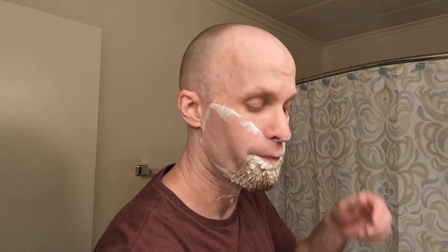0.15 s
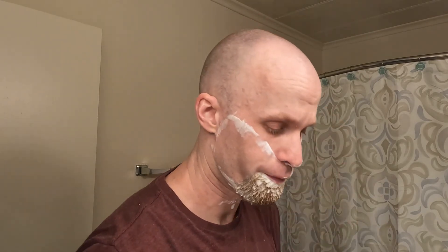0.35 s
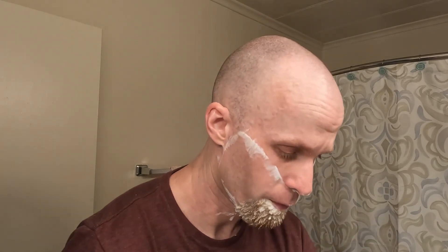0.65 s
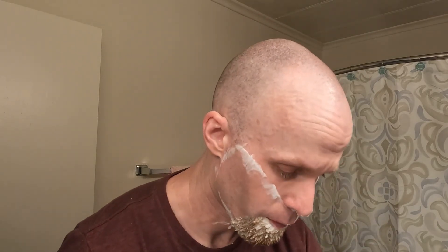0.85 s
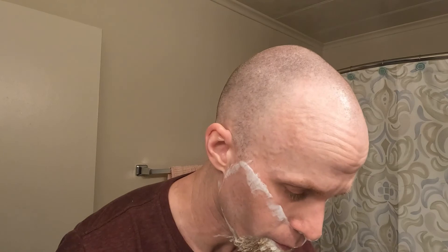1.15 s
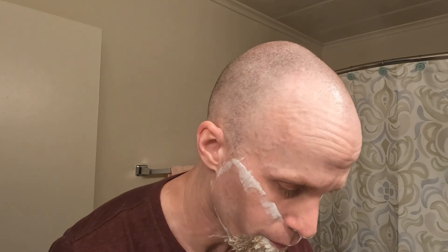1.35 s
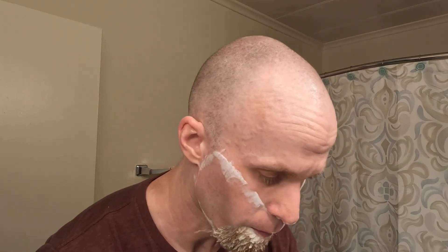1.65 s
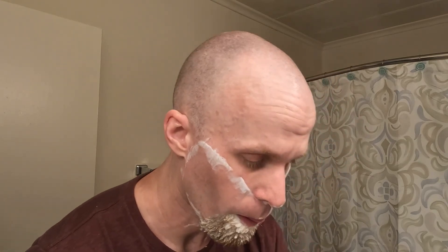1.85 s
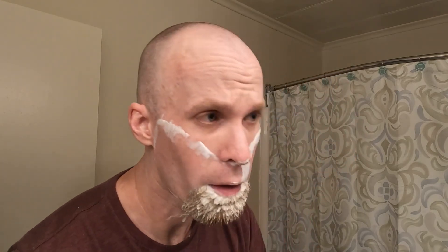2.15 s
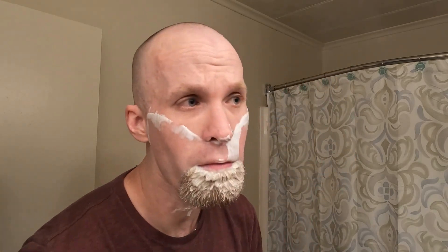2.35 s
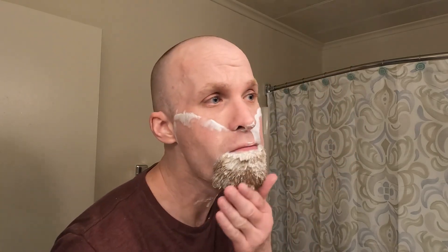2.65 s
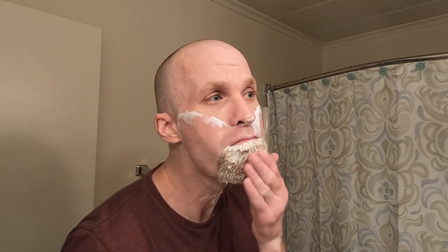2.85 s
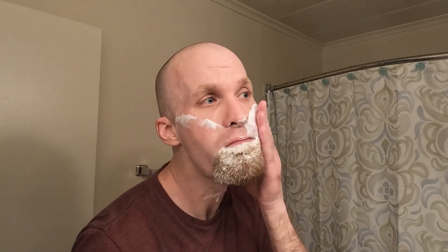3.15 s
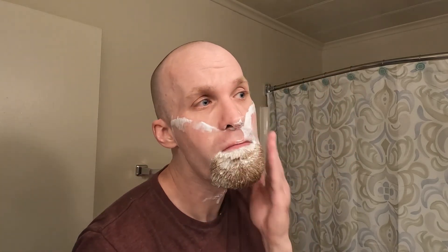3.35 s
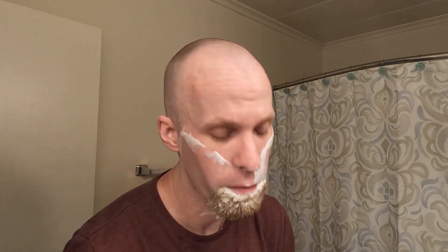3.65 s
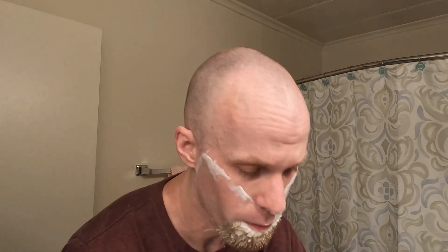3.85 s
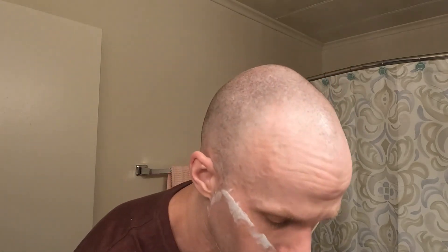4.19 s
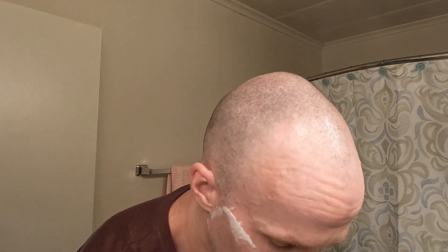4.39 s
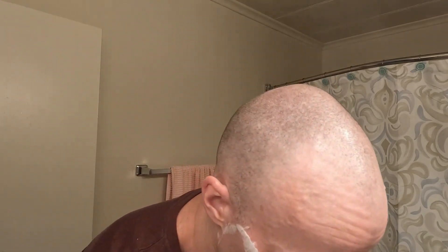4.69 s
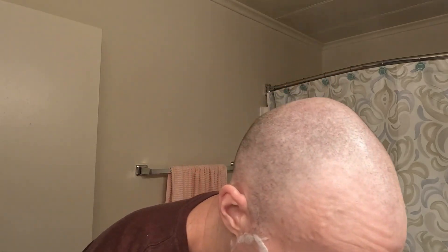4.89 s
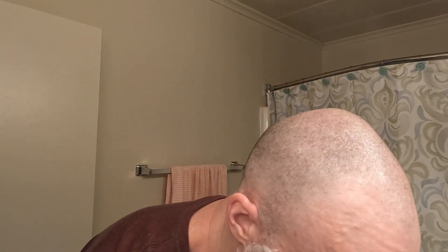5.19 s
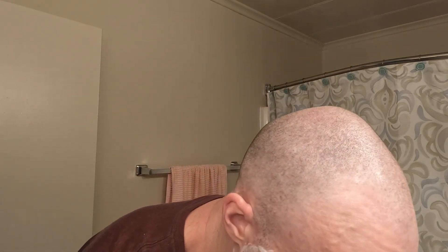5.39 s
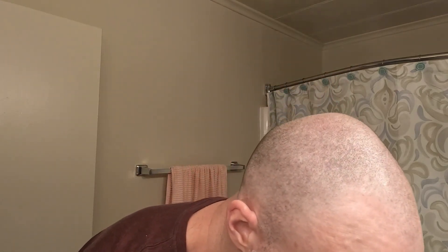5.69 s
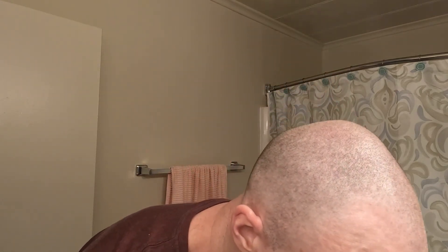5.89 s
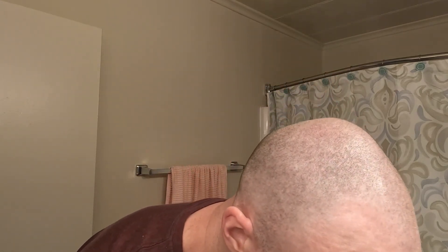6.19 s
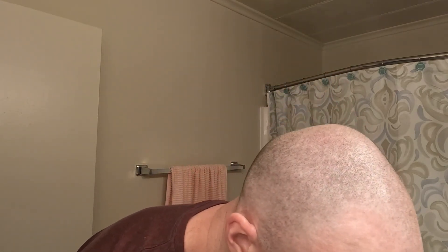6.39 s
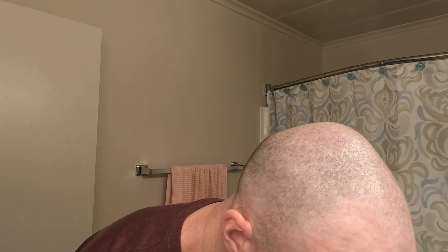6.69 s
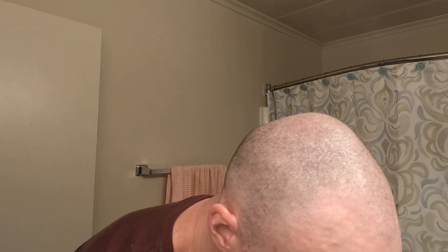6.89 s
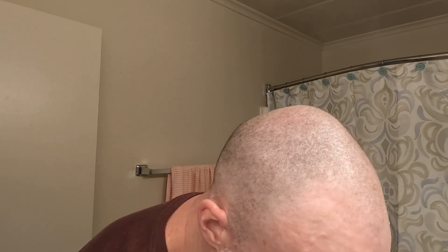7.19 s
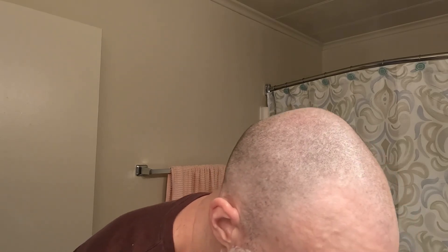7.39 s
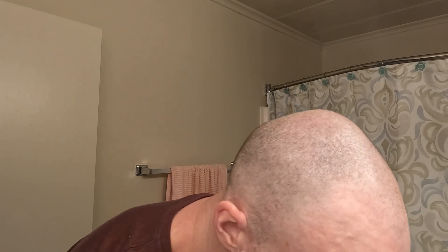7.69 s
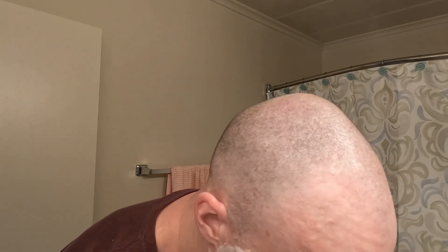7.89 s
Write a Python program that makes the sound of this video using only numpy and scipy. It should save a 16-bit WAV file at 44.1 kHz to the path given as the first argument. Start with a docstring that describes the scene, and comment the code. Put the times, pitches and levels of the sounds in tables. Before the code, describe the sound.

In a small hard-walled bathroom, close to the sink, a drain gurgles faintly, then a pipe thuds and a tap gushes for about a second, hands splashing. It shuts with a loud, ringing knock. A few drops tick, a palm rasps softly over stubble, then the tap runs again for four seconds with splashes and ends on another knock.

```python
"""A drain gurgles softly, then a pipe knocks and a tap runs into a basin in a small bathroom, twice.
The knocks are short thuds with a booming, ringing basin; the pipe knocks as the valve opens or shuts.
The jet is thousands of tiny bubbles mixed with hiss, over a low drumming of filtered noise.
Hands rinsing under it throw splashes, made of clusters of bubbles, and the last drops are smaller clusters.
Between the bursts a palm rubs over stubble: rasping bubbles and hiss, with soft bumps of narrow noise."""
import sys
import numpy as np
from scipy import signal
from scipy.fft import rfft, irfft, next_fast_len
from scipy.io import wavfile
from scipy.ndimage import uniform_filter1d, map_coordinates

SR = 44100
rng = np.random.default_rng(int(sys.argv[2]) if len(sys.argv) > 2 else 0)


def to_wav(sig):
    """Store sig (one row per channel, or 1-D mono) as 16-bit WAV at the path in sys.argv[1].

    Samples outside -1..1 are clipped; the rate is SR.
    """
    pcm = np.clip(np.atleast_2d(sig), -1, 1) * 32767
    pcm = np.round(pcm).astype(np.int16)
    wavfile.write(sys.argv[1], SR, pcm.T)  # frames by channels


N = 354563
TOP_HZ = 15740  # no sound passes above this pitch


def amp(db):
    """Turn decibels into gain."""
    return 10 ** (np.asarray(db) / 20)


def unit(x):
    """Scale a sound to an rms of 1."""
    return x / np.sqrt(np.mean(x ** 2) + 1e-20)


def along(points, hz):
    """Read values between (Hz, value) points, with pitch on a log axis."""
    f, v = np.transpose(points)
    return np.interp(np.log(hz + 1), np.log(f + 1), v)


def wobble(rate):
    """A smooth random curve through a given number of random points per second."""
    knots = rng.standard_normal(int(N * rate / SR) + 4)
    return map_coordinates(knots, [np.arange(N) * rate / SR])


def filtered(x, response):
    """Multiply the spectrum of a sound by a response, given as a function of frequency."""
    size = next_fast_len(N + SR // 2)
    hz = np.fft.rfftfreq(size, 1 / SR)
    return irfft(rfft(x, size) * response(hz), size)[:N]


def coloured(x, spectrum):
    """Shape a sound by (Hz, dB) points and scale it to an rms of 1."""
    return unit(filtered(x, lambda hz: amp(along(spectrum, hz))))


def add(track, s, sound):
    """Mix a sound into the track, starting s seconds in."""
    part = track[max(round(s * SR), 0):][:len(sound)]
    part += sound[:len(part)]


def jet():
    """The aerated jet bursts into bubbles and spray, and drums on the basin."""
    # Three spectra. Each row: frequency in Hz, level in dB per Hz.
    splatter_colour = [(300, -58), (800, -33), (1200, -6), (2000, -0.5), (3000, 2.5), (3900, 0.5),
                       (5500, -7), (8000, -19.5), (15000, -31)]
    spray_colour = [(1500, -28.5), (4000, 7.5), (5800, 7), (7200, 4), (8600, -5), (11000, -8),
                    (15500, -19.5)]
    drum_colour = [(30, -50.5), (70, -30), (110, -24), (150, -12), (300, -7), (430, 1.5), (600, -8.5),
                   (800, -15), (1500, -27), (4000, -53)]
    splatter_gain, spray_gain, drum_gain = jet_gains()
    splatter = fizz(count=16000, cycles=32.6, scatter_db=2.5, hiss_db=2.0)
    splatter = bowl(coloured(splatter, splatter_colour))
    spray = coloured(fizz(count=16000, cycles=8.6, scatter_db=0.5, hiss_db=4.0), spray_colour)
    drumming = bowl(coloured(rng.standard_normal(N), drum_colour)) * amp(1.23 * wobble(14))
    flutter = amp(0.5 * wobble(45))  # the stream breaks up unevenly
    water = flutter * (amp(-1.0) * splatter_gain * splatter + amp(2.0) * spray_gain * spray)
    return bathroom(water, wet_db=-9.5) + drum_gain * drumming


def jet_gains():
    """Gains of splatter, spray and drumming: a hand turns the jet to spray and shields the basin."""
    # Runs of the tap. Each row: valve opens in seconds, valve shuts in seconds,
    # then the base levels of splatter, fine spray and basin drumming, each in dB.
    runs = [(0.614, 1.671, -35, -43, -42), (4.041, 7.992, -35, -43, -42.5)]
    rise_s, spray_rise_s = 0.047, 0.05  # spray builds more slowly
    spray_lingers_s = 0.082  # and outlasts the jet
    splatter, spray, drum = np.zeros((3, N))
    for opens, shuts, splatter_db, spray_db, drum_db in runs:
        splatter += amp(splatter_db) * tap_flow(opens, shuts, rise_s, dies_db_per_s=190)
        spray += amp(spray_db) * tap_flow(opens, shuts + spray_lingers_s, spray_rise_s, dies_db_per_s=270)
        drum += amp(drum_db) * tap_flow(opens, shuts, rise_s, dies_db_per_s=120)
    lift_db = rinsing()
    # dB that the basin sounds lose for each dB that the spray gains
    shields_splatter, shields_drum = 0.05, 0.15
    return splatter * amp(-shields_splatter * lift_db), spray * amp(lift_db), drum * amp(-shields_drum * lift_db)


def tap_flow(opens, shuts, rise_s, dies_db_per_s):
    """Gain of one run: the water arrives, builds up, holds, and dies away after the shutting time."""
    fall_s = 0.024  # the water takes this long to reach the basin
    t = np.arange(N) / SR
    build_up = np.clip((t - opens - fall_s) / rise_s, 0, 1)
    return build_up * amp(-dies_db_per_s * np.maximum(t - shuts, 0))


def rinsing():
    """The dB by which a hand or razor under the jet raises the spray: in fast, drifting off, then out."""
    # Times under the jet. Each row: start in seconds, length in seconds, spray lift in dB before it sags.
    rinses = [(0.769, .17, 5), (1.206, 0.18, 6.5), (1.418, 0.33, 6.5), (4.189, 0.047, 6.5),
              (4.328, .28, 2.5), (4.765, 0.29, 3.5), (5.997, 0.34, 1.5), (6.812, 0.18, 5.5),
              (7.252, 0.09, 5.5), (7.708, 0.47, 5)]
    enter_s, leave_s, sag_s = 0.018, 0.05, 0.9
    t = np.arange(N) / SR
    lift_db = np.zeros(N)
    for s, length, db in rinses:
        age = np.maximum(t - s, 0)
        held = np.clip(age / enter_s, 0, 1) * np.clip(1 - (age - length) / leave_s, 0, 1)
        drift = np.exp(-age / sag_s)  # the hand drifts off centre
        lift_db = np.maximum(lift_db, db * held * drift)
    return lift_db


def fizz(count, cycles, scatter_db, hiss_db):
    """A swarm of bubbles spread evenly over time and pitch, on a bed of hiss."""
    when, pitch, chance = rng.random((count, 3)).T
    hz = 900 + pitch * 13000
    # a few bubbles are much louder than the rest
    sizes = amp(-scatter_db * np.log(np.maximum(chance, 0.004))) * hz
    swarm = unit(bubbles(when * N / SR, hz, sizes, cycles))
    return swarm + amp(hiss_db) * rng.standard_normal(N)


def bubbles(times, hz, sizes, cycles, size=320):
    """Fading sines, down 60 dB after some cycles; pitch climbs as each bubble nears the surface."""
    t = np.arange(size) / SR
    turns = np.minimum(hz, TOP_HZ)[:, None] * t
    age = turns / cycles
    soft_start = 1 - np.exp(-2 * turns)
    climbing = np.sin(2 * np.pi * turns * (1 + 0.19 * np.minimum(age, 1)))
    rings = sizes[:, None] * soft_start * amp(-60 * age) * climbing
    at = (np.maximum(times, 0) * SR).astype(int)[:, None] + np.arange(size)
    swarm = np.bincount(at.ravel(), rings.ravel(), N)[:N]
    # bubbles this small radiate no bass
    return filtered(swarm, lambda f: (1j * f / (1j * f + 500)) ** 2)


def bowl(x):
    """The basin resonates, lifting (or dipping) narrow bands of whatever sounds inside it."""
    # Resonances of the bowl. Each row: centre in Hz, width in Hz, lift in dB.
    resonances = [(247.7, 14, 9), (404.5, 28, 5.5), (433.6, 27.5, 5), (466, 13, 2.5), (544, 63, 9.5),
                  (679.8, 27, 13.5), (880, 28, 9.5), (1085, 40, 13.5), (1405, 25, -10.5), (1433, 65, 3),
                  (1980, 110, 6.5), (2840, 58, 3), (3280, 88, -3.5), (3575, 65, 4.5)]

    def response(hz):
        return amp(sum(db / (1 + (2 * (hz - centre) / width) ** 2) for centre, width, db in resonances))

    return unit(filtered(x, response))


def knocks():
    """The valve jolts the pipe: a dull thud, a boom from the basin, and a few modes ringing on."""
    # The basin's dull boom. Each row: frequency in Hz, level in dB per Hz before the tilt.
    boom_colour = [(25, -47), (58, -18), (95, -15.5), (125, -3.5), (180, -6.5), (205, -6), (245, 4),
                   (300, -8.5), (400, -3), (510, -7), (680, -11.5), (770, -21.5), (1000, -18.5),
                   (1300, -22), (2000, -30.5), (5000, -50)]
    # Long-ringing modes of basin and cabinet.
    # Each row: pitch in Hz, level in dB before the tilt, time to fall 60 dB in seconds.
    modes = [(78.6, -15.5, 0.9), (126.7, -10, .35), (152, -8, 1.0), (179.6, -24, 0.61), (246, -16, 0.45),
             (288, -16.5, 1.2), (314, -17, 2.1), (394, -14, 0.5), (412, -5, .35), (479, -3.5, 0.66),
             (681, -6.5, 0.55), (894, -14, 0.34)]
    out, t = np.zeros(N), np.arange(SR) / SR
    grid = np.fft.rfftfreq(SR, 1 / SR)
    for s, db, thud_hz, boom_db, tilt_db, ring_db in contacts():
        # a soft contact: a few cycles under a smooth hump
        swell = t / 0.004
        thud = swell ** 2 * np.exp(1 - swell ** 2) * np.sin(2 * np.pi * thud_hz * t)
        colour = amp(along(boom_colour, grid) + tilt_db * np.log2((grid + 20) / 400))
        boom = unit(irfft(colour * np.exp(2j * np.pi * rng.random(len(grid))), SR))
        # a quick fade, then a quieter, slower one
        boom *= amp(-60 * t / 0.21) + amp(-9.5 - 60 * t / 0.93)
        ring = np.zeros(SR)
        for hz, level, t60 in modes:
            fade = amp(level + tilt_db * np.log2(hz / 400) - 60 * t / t60)
            ring += fade * np.sin(2 * np.pi * (hz * t + rng.random()))
        basin = amp(boom_db) * (boom + amp(ring_db) * ring) * (1 - np.exp(-t / 0.0032))
        add(out, s, amp(db) * thud + basin)
    return out


def contacts():
    """Every knock is a first touch of the pipe on its bracket, a blow and a rebound."""
    # Knocks as the valve moves and as the water surges through. Each row: blow in seconds,
    # thud level in dB, thud pitch in Hz, boom level in dB, boom tilt in dB per octave,
    # first touch in dB relative to the blow, ring level in dB relative to the boom.
    blows = [(.623, -22, 320, -34, -.5, 2, -10), (.685, -30, 280, -44, -10, -9, -15),
             (1.683, -12.5, 450, -22, -.5, -7.5, -9.5), (4.039, -36.5, 227, -48, 0.5, 4, -16),
             (4.085, -37, 220, -51.5, -9, -6, -15), (7.999, -16.5, 415, -24.5, -1, -9.5, -9)]
    for s, db, hz, boom_db, tilt_db, touch_db, ring_db in blows:
        # delay in seconds, level step in dB, pitch ratio: touch, blow, rebound
        for delay, step_db, ratio in [(-0.008, touch_db, 1.5), (0, 0, 1), (0.01, -6, 0.765)]:
            yield s + delay, db + step_db, hz * ratio, boom_db + step_db, tilt_db, ring_db


def splashes(count=70):
    """Water spilling off the hands traps a cluster of like-sized bubbles."""
    # Splashes off the hands. Each row: start in seconds, level in dB before a small trim,
    # bubble pitch in Hz, pitch spread in octaves, length scale in seconds.
    spills = [(0.785, -30.5, 5000, 0.46, .023), (1.102, -29, 2150, 0.67, .013),
              (1.214, -29, 3450, 0.49, 0.041), (1.318, -31, 3050, 0.28, 0.027),
              (1.445, -38, 3850, 0.13, 0.017), (1.502, -29.5, 5000, 0.27, .011),
              (4.23, -31.5, 3980, .52, .03), (4.707, -20.5, 3660, .07, .003),
              (4.716, -28.5, 3300, .062, .0043), (4.773, -38, 7000, .16, .0089),
              (4.894, -29.5, 3950, 0.21, .027), (5.026, -35, 2280, 0.11, .055),
              (5.099, -38.5, 3520, .14, .13), (6.25, -32, 2100, 0.26, 0.023),
              (6.304, -34.5, 1590, 0.24, .03), (6.829, -26.5, 2800, 0.29, .02),
              (7.352, -32, 2370, 0.21, 0.02), (7.437, -45, 2850, .15, .011), (7.818, -36, 1127, 0.05, .01)]
    when, pitch, loud = rng.standard_normal((len(spills), count, 3)).T
    s, db, hz, spread, length = np.transpose(spills)
    pitches = hz * 2 ** (spread * pitch)
    # the bubbles of a splash share its energy; small ones die sooner
    shares = amp(6.0 * loud)
    shares = shares / np.linalg.norm(shares, axis=0)
    sizes = amp(db - 0.5) * shares * np.sqrt(length * pitches)
    times = s + 0.8 * length * np.abs(when)
    cluster = bubbles(times.ravel(), pitches.ravel(), sizes.ravel(), cycles=37, size=1400)
    return bathroom(cluster, wet_db=-4)


def drops(count=12):
    """Each late drop lands with a tick and shatters into weaker ones."""
    # Last drops on the basin. Each row: landing in seconds, level in dB before a small trim,
    # middle pitch in Hz.
    landings = [(1.816, -28.5, 7050), (1.885, -33.5, 4300), (1.925, -46, 4200), (2.008, -44.5, 7500),
                (2.035, -39, 8500), (2.044, -46, 3400), (2.18, -61, 10000)]
    s, db, hz = np.transpose(landings)
    delay, pitch = rng.standard_normal((len(landings), count, 2)).T
    delay = np.abs(delay) - np.abs(delay).min(0)  # the first tick comes on time
    sizes = amp(db + 0.5 - 6.7 * delay)  # later ticks are weaker
    times = s + 0.0073 * delay
    pitches = hz * 2 ** (0.28 * pitch)
    ticks = bubbles(times.ravel(), pitches.ravel(), sizes.ravel(), cycles=9.6)
    return bathroom(ticks, wet_db=-5)


def stubble():
    """Short hairs flick back under the sliding palm; the hand bumps and scuffs as it moves."""
    # Colour of the rasp. Each row: frequency in Hz, level in dB per Hz.
    rasp_colour = [(300, -31), (1000, 2.5), (2000, 3.5), (3100, 8), (4000, 4), (5300, 3), (8000, -9.5),
                   (11000, -15), (15000, -27)]
    # Soft bumps and scuffs. Each row: start in seconds, level in dB before a small trim,
    # centre in Hz, width in Hz, length in seconds.
    scuffs = [(.495, -63, 610, 150, .07), (2.685, -60, 575, 130, .082), (3.082, -56.5, 1750, 400, 0.019),
              (3.1, -66, 1550, 400, .07), (3.541, -56.5, 425, 140, .034), (3.755, -54, 456, 100, 0.069),
              (3.76, -63.5, 900, 250, 0.046)]
    rasp = coloured(fizz(count=14000, cycles=6.3, scatter_db=2.5, hiss_db=2.5), rasp_colour)
    return bathroom(palm_strokes() * rasp + amp(0.5) * murmurs(scuffs), wet_db=-8)


def palm_strokes():
    """Gain of the rasp: in each stroke the palm speeds up and slows again."""
    # Strokes on the cheek. Each row: start in seconds, length in seconds, peak rasp gain in dB.
    strokes = [(2.473, 0.15, -58.5), (2.658, 0.17, -58), (2.784, 0.21, -53), (2.914, .25, -60.5)]
    gain = np.zeros(N)
    for s, length, db in strokes:
        add(gain, s, amp(db) * np.sin(np.linspace(0, np.pi, int(length * SR))))
    return gain


def drain():
    """Water trickles through the trap; larger air pockets hum briefly."""
    # Colour of the trickle. Each row: frequency in Hz, level in dB per Hz.
    trickle_colour = [(100, -45), (200, -14.5), (270, -1), (330, 2), (410, 0), (480, -14.5), (900, -19),
                      (3000, -81)]
    # Air pockets. Each row: start in seconds, level in dB before a trim, pitch in Hz, length in seconds.
    gulps = [(0.251, -50, 326, 0.052), (0.34, -53, 347, 0.15), (2.019, -44.5, 375, 0.089),
             (2.315, -50, 337, .028), (2.495, -56, 295, 0.12), (2.835, -57, 160, 0.061),
             (2.94, -51, 282, 0.041), (3.206, -49, 332, .019), (3.883, -47, 407, 0.14)]
    trickle = amp(-61.5 + 3.4 * wobble(22)) * coloured(rng.standard_normal(N), trickle_colour)
    width = 0.048  # bandwidth of an air pocket as a share of its pitch
    pockets = murmurs([(s, db, hz, width * hz, length) for s, db, hz, length in gulps])
    return trickle + amp(-5.0) * bathroom(pockets, wet_db=-16.5)


def murmurs(rows):
    """Short swells of noise in a narrow bell-shaped band, used for air pockets and scuffs."""
    out, hz = np.zeros(N), np.fft.rfftfreq(SR // 4, 1 / SR)
    for s, db, centre, width, length in rows:
        bell = -0.5 * ((hz - centre) / width) ** 2
        band = irfft(np.exp(bell + 2j * np.pi * rng.random(len(hz))))[:int(length * SR)]
        swell = np.sin(np.linspace(0, np.pi, len(band)))
        add(out, s, amp(db) * unit(band * swell))
    return out


def bathroom(x, wet_db, count=4):
    """Direct sound plus the hard walls' tail, whose paths shift as the body moves."""
    # Echo of the room. Each row: frequency in Hz, time to fall 60 dB in seconds.
    walls = [(100, 0.78), (350, 0.7), (700, 0.36), (3000, 0.28), (12000, 0.23)]
    noise = rng.standard_normal((count, 2 * SR // 3))
    hz, t, z = signal.stft(noise, SR, nperseg=256)
    fade = amp(-60 * t / along(walls, hz)[:, None])
    tails = signal.istft(z * fade, SR, nperseg=256)[1]
    # the tail starts 4 ms after the direct sound
    tails = np.pad(tails / np.linalg.norm(tails[0]), [(0, 0), (SR // 250, 0)])
    # drift at random between several tails
    blend = np.array([wobble(2.013) for _ in tails])
    echoes = signal.oaconvolve(x[None], tails, axes=1)[:, :N]
    wet = np.sum(blend * echoes, 0) / np.linalg.norm(blend, axis=0)
    return (x + amp(wet_db) * wet) / np.hypot(1, amp(wet_db))


def still_air():
    """The still air of the room is a faint, steady, coloured noise."""
    # Colour of the air. Each row: frequency in Hz, level in dB per Hz.
    air_colour = [(25, -31.5), (70, -9), (120, -1), (500, 4), (1000, -4.5), (2000, -7.5), (4000, -14),
                  (7000, -23), (15000, -47)]
    return amp(-64.5) * coloured(rng.standard_normal(N), air_colour)


def scene():
    """Mix all sources, with a faint random stereo spread, almost only in the highest treble."""
    # Stereo spread. Each row: frequency in Hz, side level in dB.
    spread_colour = [(2000, -53.5), (4000, -70.5), (8000, -54), (11000, -21), (12500, 1.5), (15000, -20)]
    mid = jet() + knocks() + splashes() + drops() + stubble() + drain() + still_air()
    # smear the mix with a short burst of noise, so that the side signal is unlike the middle
    burst = rng.standard_normal(SR // 40)
    smeared = signal.fftconvolve(mid, burst / np.linalg.norm(burst))[:N]
    side = filtered(smeared, lambda hz: amp(along(spread_colour, hz)))
    return np.array([mid + side, mid - side])


def record(dry):
    """The microphone port ripples the treble and cuts one narrow notch; nothing passes the band limit."""
    # Ripple of the port. Each row: frequency in Hz, level in dB.
    port = [(8800, -0.5), (9500, -2.5), (10800, 9.5), (11900, -2), (13000, 2), (14100, -11), (15500, -7)]

    def response(hz):
        notch = amp(-22 / (1 + ((hz - 9040) / 85) ** 4))  # 22 dB deep at 9040 Hz
        return amp(along(port, hz)) * notch * (hz < TOP_HZ)

    return np.array([filtered(x, response) for x in dry])


dry = scene()
out = record(dry)
to_wav(out)
```